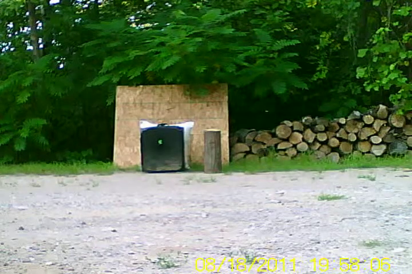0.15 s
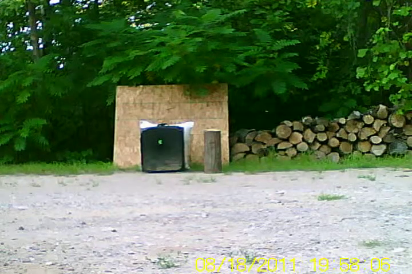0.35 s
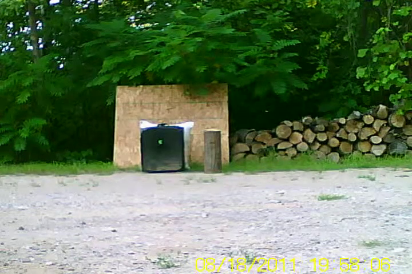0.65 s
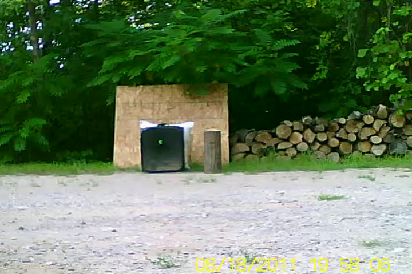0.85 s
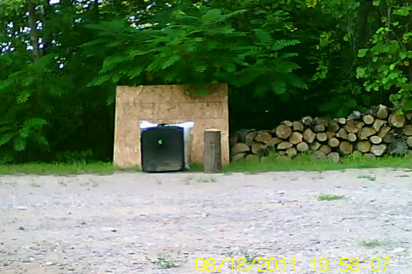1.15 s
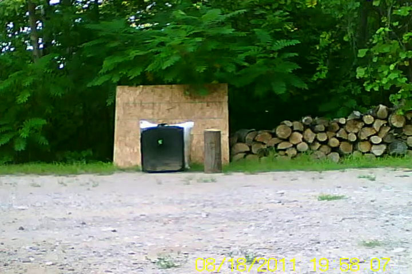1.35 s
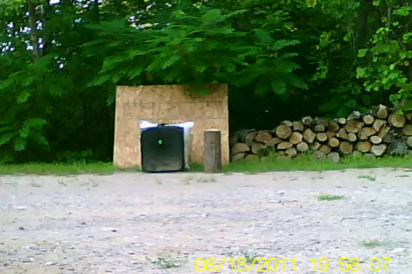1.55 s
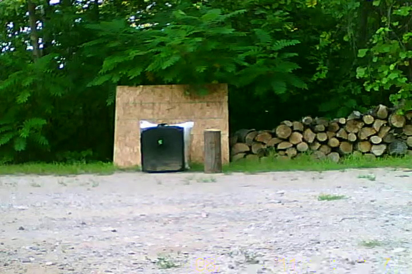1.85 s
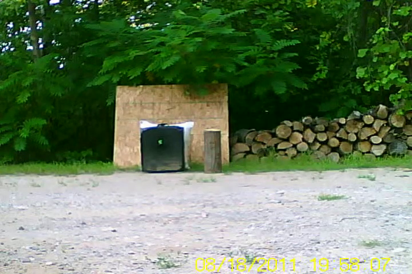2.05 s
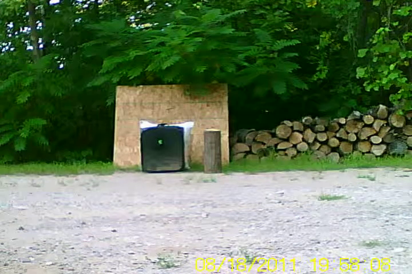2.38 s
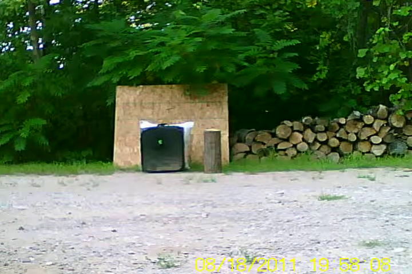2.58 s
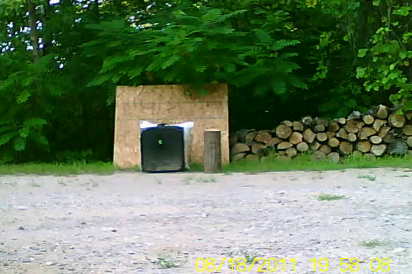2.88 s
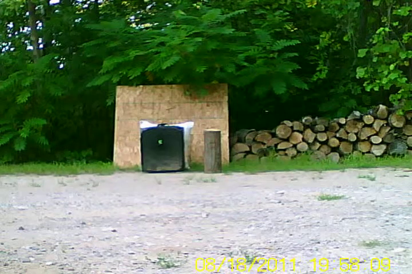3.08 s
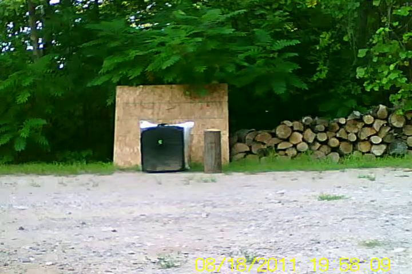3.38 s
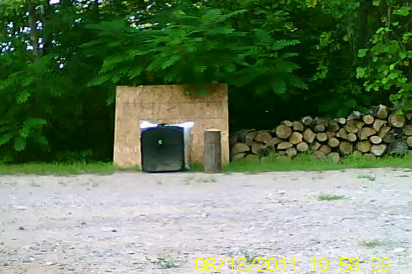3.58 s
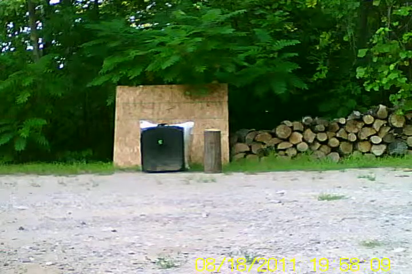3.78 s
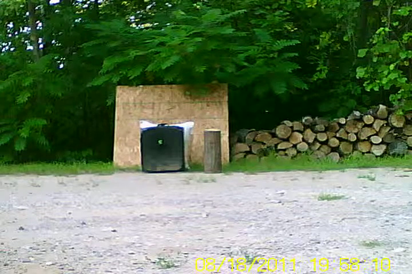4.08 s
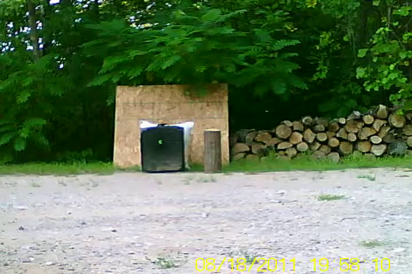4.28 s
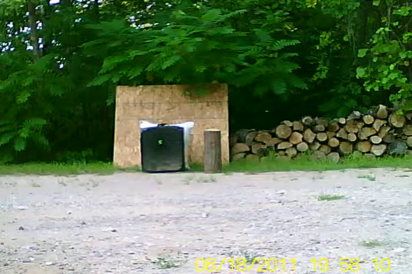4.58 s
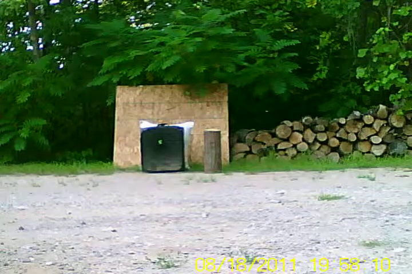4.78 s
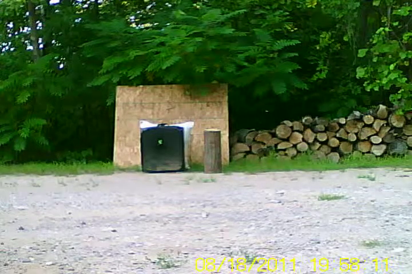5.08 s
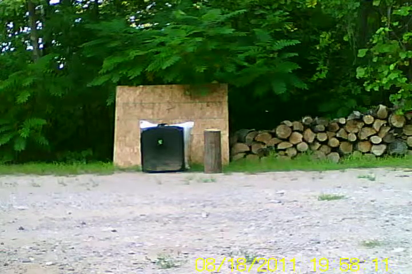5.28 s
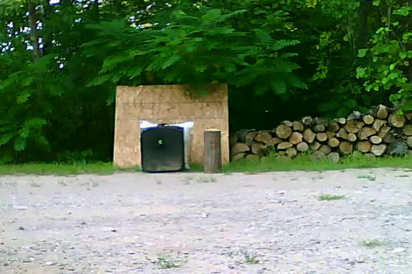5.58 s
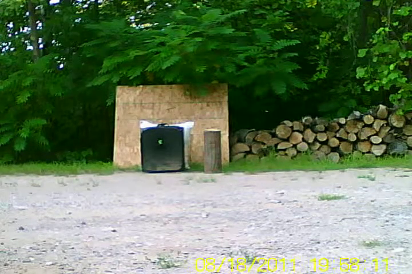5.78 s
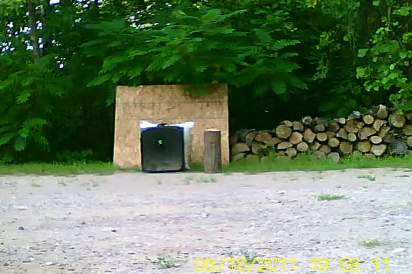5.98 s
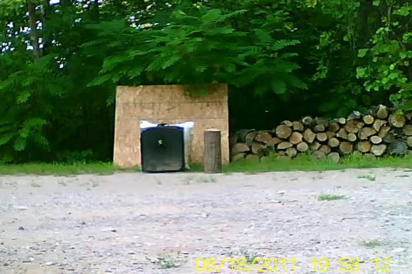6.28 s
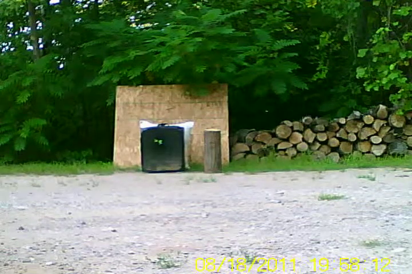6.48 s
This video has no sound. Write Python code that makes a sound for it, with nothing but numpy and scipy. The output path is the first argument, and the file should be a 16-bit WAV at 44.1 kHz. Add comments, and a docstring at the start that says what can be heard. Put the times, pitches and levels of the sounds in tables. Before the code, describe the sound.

A quiet yard edged by trees, with low air rumble and thin hiss. Two crickets chirp in short triple pulses, one close, one deeper in the leaves, with occasional soft insect rasps and a few dry ticks. Near the end a bow clicks and snaps, an arrow whistles close past the microphone, falling in pitch, and slams into a bag target with a short woody echo from the trees.

```python
"""A backyard among trees: low rumble, thin hiss and a faint hum that is gone by 1.7 s. Two crickets chirp,
one close and one deeper in the leaves, with soft insect rasps, dry ticks near 2 s and a far call near 2.8 s.
At 5.88 s a bow's release clicks and its string snaps forward; the arrow whistles by 0.55 m from the
microphone with falling pitch, then thuds into a bag target before a plywood board, and the trees answer.
Insects and arrow are shaped tones and coloured noise; blows are decaying noise and ringing tones."""
import sys
import numpy as np
from scipy import signal
from scipy.fft import rfft, irfft, next_fast_len
from scipy.io import wavfile
from scipy.ndimage import map_coordinates

SR = 44100
rng = np.random.default_rng(int(sys.argv[2]) if len(sys.argv) > 2 else 0)


def persist_wave(psi):
    """Save psi, clipped to +-1, as 16-bit WAV."""
    counts = np.round(np.clip(psi, -1, 1) * 32767).astype(np.int16)
    wavfile.write(sys.argv[1], SR, np.atleast_2d(counts).T)


N = 292824

# Every colour is a relative spectrum: its noise is brought to rms 1 before it gets a level.
# still air of the yard: pitch_hz, relative_db
YARD_AIR_COLOUR = [(15, -4), (27, -4), (60, -10), (85, -13.5), (115, -15.5), (170, -20), (260, -23),
                   (400, -27), (734, -32), (2300, -39), (3600, -41.5), (5600, -41.5), (9700, -45),
                   (11500, -50)]
# how long the trees hold each pitch: pitch_hz, t60_s
TREE_DECAY = [(100, 0.42), (500, 0.7), (1600, 0.88), (3000, 0.49), (6000, 0.4), (10000, 0.24)]
# how strongly the trees return each pitch: pitch_hz, relative_db
TREE_COLOUR = [(60, 3), (500, -14), (1000, -11.5), (1600, -5), (2400, -2.5), (3500, 0), (6000, 4.5),
               (10000, -2)]
SOUND_SPEED = 343  # m/s

# high insect rasps: start_s
RASP_TIMES = [1.167, 3.177, 5.337]
# rasp noise: pitch_hz, relative_db
RASP_COLOUR = [(3000, -29), (4500, -4), (6000, -3), (7500, -9), (10000, -21), (12000, -40)]
RASP_DB, RASP_ATTACK_S, RASP_T60_S = -54.5, 0.018, 0.61

# dry ticks: start_s, level_db
TICKS = [(1.998, -56), (2.012, -48), (2.025, -54), (2.093, -45), (2.104, -53)]
# crack of a tick: pitch_hz, relative_db
TICK_COLOUR = [(1000, -22), (2100, -7), (2650, 1), (3200, -6), (4000, -7), (10000, -25)]
TICK_CRACK_T60_S = .055
TICK_HZ, TICK_RING_DB, TICK_RING_T60_S = 2620, -4, .09  # one resonance for all; its dB is relative to the crack

# Every chirp of a cricket is built alike; the pauses between chirps differ.
# far cricket: last_stroke_s
FAR_CHIRPS = [.243, .643, 1.157, 1.758, 2.252, 2.62, 3.152, 3.6, 4.08, 4.474, 4.832, 5.285, 5.868]
FAR_DB, FAR_HZ = -53.5, 5007  # last stroke
# halo of the far cricket in the leaves: pitch_hz, relative_db
LEAF_SCATTER = [(4200, -42), (4700, -6), (5000, 0), (5200, -7), (5600, -49)]
# near cricket, strokes falling in pitch: last_stroke_s
NEAR_CHIRPS = [.383, 1.358, 2.088, 2.997, 3.573, 4.126, 4.678, 5.186]
NEAR_DB, NEAR_HZ, NEAR_GLIDE_HZ = -48.6, 4460, -170  # last stroke; glide is to either side of its middle
STROKE_S = .044  # from one wing stroke to the next
SWELL_POWER = 2.63  # a chirp starts softly and levels off towards its last stroke
STROKE_HZ_PER_DB, STROKE_SAG_HZ = 9.5, 130  # weak strokes sit lower; the pitch sags as the wing stops

# small metal click of the release: pitch_hz, relative_db
RELEASE_COLOUR = [(400, -11), (2000, -12), (3000, -8), (4400, 4), (7000, -10), (11000, -14)]
# bow contacts, from the snap of the string to the rattle of the limbs: start_s, level_db, t60_s
BOW_CONTACTS = [(5.895, -18.5, 0.028), (5.9, -24.5, 0.13), (5.918, -36.5, 0.33)]
# noise of the bow contacts: pitch_hz, relative_db
BOW_COLOUR = [(40, -5), (100, 1), (200, -2), (600, -0.5), (1000, -5), (1350, -5), (1900, -10), (2600, -5.5),
              (4200, -10), (6000, -12.5), (8000, -19), (11000, -30)]
# tones of the arrow: pitch_hz at rest, level_db at 1 m, forward_beaming_db, flex_swell (0-1)
FLETCHING = [(110, -28.5, 1, 0), (311.5, -34.5, 5, 0), (640, -35.5, 10, 0.72), (1075, -55, 14, 0.4)]
# hiss of the arrow's wake: pitch_hz, relative_db
WAKE_COLOUR = [(100, -10), (350, 2), (900, -12), (1400, -7), (1700, 0.5), (2050, 3.5), (2500, 3.5),
               (2950, -6.5), (4200, -2), (7500, -14), (11000, -22)]
# arrow pierces the cover, is stopped by the filling, shoves the bag: start_s, slap_db, slap_hz, crack_db
STRIKES = [(6.0549, -16, 623, -14.5), (6.0594, 0, 670, -21), (6.064, -14, 420, -42)]
# ringing of bag and board: pitch_hz, relative_db, t60_s
TARGET_TONES = [(181.4, -6.5, 0.09), (266, -8, 0.1), (394, -11, 0.053), (579, -5.5, 0.063),
                (777, -5, 0.073), (934, -11.5, 0.056), (1184, -6.5, 0.058), (1545, -2.5, 0.024),
                (1660, -5, 0.025), (1960, -2.5, 0.026), (2390, -8, 0.027)]
# tearing of the target's cover: pitch_hz, relative_db
CRACK_COLOUR = [(300, -5), (1700, 1.5), (2600, -6.5), (3200, -12), (4300, 1), (5600, -1), (6500, -17),
                (7700, -3), (9000, -22), (10400, -16.5), (11800, -23)]
# shudder of the bag's filling: pitch_hz, relative_db
FILLING_COLOUR = [(40, -18), (160, 6), (210, -2), (320, 0), (480, -1.5), (720, 1.5), (1300, -9.5),
                  (2500, -12.5), (3300, -24), (5500, -18.5), (11000, -42)]

TOP_HZ = 12100  # band limit at the microphone


def amp(db):
    """Decibels to gain."""
    return 10 ** (np.asarray(db) / 20)


def unit(x):
    """Scale to rms 1."""
    return x / np.sqrt(np.mean(x ** 2) + 1e-20)


def clock():
    """The time of every sample, in seconds."""
    return np.arange(N) / SR


def along(points, hz):
    """Read (Hz, value) points on a log frequency axis."""
    f, v = np.transpose(points)
    return np.interp(np.log(hz + 1), np.log(f), v)


def filtered(x, response):
    """Multiply the spectrum of x by a response of frequency."""
    m = next_fast_len(len(x) + SR // 4)
    spectrum = rfft(x, m) * response(np.fft.rfftfreq(m, 1 / SR))
    return irfft(spectrum, m)[:len(x)]


def noise(colour):
    """Noise of rms 1 with a (Hz, dB) spectrum."""
    return unit(filtered(rng.standard_normal(N), lambda hz: amp(along(colour, hz))))


def wobble(rate):
    """A smooth random curve with rate knots a second."""
    knots = rng.standard_normal(int(N * rate / SR) + 4)
    return map_coordinates(knots, [clock() * rate])


def decay(t, t60, attack):
    """Envelope of a blow at t = 0: a quick rise, then a fall of 60 dB in t60; silent before."""
    t = np.maximum(t, 0)
    return np.exp(-np.log(1000) * t / t60) * (1 - np.exp(-t / attack))


def add(track, s, sound):
    """Mix a sound into the track from time s."""
    part = track[round(s * SR):][:len(sound)]
    part += sound[:len(part)]


def outdoors(floor_db=-45.1, hum_hz=183, hum_db=-57):
    """Distant rumble and hiss, a far chorus of crickets as band noise, and a faint hum that fades early."""
    air = amp(floor_db + 0.44 * wobble(4)) * noise(YARD_AIR_COLOUR)
    chorus_colour = [(3600, -28), (4300, -5.5), (5100, -12), (5900, -47)]
    chorus = amp(-70.5 + 1.3 * wobble(9)) * noise(chorus_colour)
    fade = np.interp(clock(), [1.1, 1.7], [1, 0])
    hum = amp(hum_db) * fade * np.sin(2 * np.pi * hum_hz * clock() + .5 * wobble(4.9))
    return air + chorus + hum


def trees(x, build_s=0.034, echo_s=0.153, echo_db=3):
    """Trunk and leaf scatter builds up, a far yard edge answers; each frequency dies at its own speed."""
    hz, t, grains = signal.stft(rng.standard_normal(SR), SR, nperseg=256)
    shape = amp(along(TREE_COLOUR, hz))[:, None] * decay(t, along(TREE_DECAY, hz)[:, None], build_s)
    echo = 1 + amp(echo_db) * decay(t - echo_s, 0.12, attack=0.0022)
    tail = signal.istft(grains * shape * echo, SR, nperseg=256)[1]
    return signal.fftconvolve(x, tail / np.linalg.norm(tail))[:N]


def far_call(at_s=2.81, length_s=.1, db=-69):
    """A faint, thin call from deep in the trees: a swell of narrow noise with an unsteady level."""
    swell = np.exp(-((clock() - at_s) / length_s) ** 2)
    return amp(db + 2.3 * wobble(35.4)) * swell * noise([(2300, -25), (2780, 2), (3250, -25)])


def rasps():
    """An insect further off gives a soft high rasp of decaying noise about every two seconds."""
    envelope = sum(decay(clock() - s, RASP_T60_S, RASP_ATTACK_S) for s in RASP_TIMES)
    return amp(RASP_DB) * noise(RASP_COLOUR) * envelope


def ticks():
    """A few dry ticks in quick succession, each a short crack with a brief, unsteady ring."""
    t = clock()

    def taps(t60):
        """Envelope of all the ticks."""
        return sum(amp(db) * decay(t - s, t60, attack=.0008) for s, db in TICKS)

    crack = taps(TICK_CRACK_T60_S) * noise(TICK_COLOUR)
    tone = np.sin(2 * np.pi * TICK_HZ * t + .9 * wobble(200))
    return crack + amp(TICK_RING_DB) * taps(TICK_RING_T60_S) * tone


def cricket(chirps, count, swell_db, hz, glide_hz, width_s, rough):
    """A chirp is count wing strokes swelling by swell_db; each slides in pitch and sags as the wing stops."""
    out, t = np.zeros(N), np.arange(-SR // 25, SR // 25) / SR
    slide = glide_hz * np.tanh(t / width_s) - STROKE_SAG_HZ * np.clip(t / width_s - .5, 0, 1)
    for s in chirps:
        for k in range(count):  # counted back from the last stroke
            stroke_db = -swell_db * (k / (count - 1)) ** SWELL_POWER
            pitch = hz + STROKE_HZ_PER_DB * stroke_db + slide
            # uneven teeth on the wing jitter the phase
            teeth = rough * unit(signal.resample(rng.standard_normal(24), len(t)))
            tone = np.sin(2 * np.pi * np.cumsum(pitch) / SR + teeth)
            stroke = np.exp(-(t / width_s) ** 2) * tone
            add(out, s - k * STROKE_S + t[0], amp(stroke_db) * stroke)
    return out * (1 + 0.34 * wobble(300))


def crickets(halo_db=-10, halo_lead_s=0.038, halo_s=0.073):
    """One cricket deeper in the leaves, whose scatter fills the gaps between its strokes, and one close by."""
    far = cricket(FAR_CHIRPS, count=3, swell_db=3, hz=FAR_HZ, glide_hz=0, width_s=.012, rough=.12)
    # the halo is centred ahead of the last stroke
    blur = sum(np.exp(-((clock() - s + halo_lead_s) / halo_s) ** 2) for s in FAR_CHIRPS)
    halo = amp(halo_db) * blur * noise(LEAF_SCATTER)
    near = cricket(NEAR_CHIRPS, count=3, swell_db=9, hz=NEAR_HZ, glide_hz=NEAR_GLIDE_HZ,
                   width_s=.0105, rough=.4)
    return amp(NEAR_DB) * near + amp(FAR_DB) * (far + halo)


def release(at_s=5.8825, db=-37, t60=0.077):
    """The catch lets go of the string with a small bright click of decaying noise."""
    return amp(db) * noise(RELEASE_COLOUR) * decay(clock() - at_s, t60, attack=0.00072)


def bow(grit_db=3.4, kick_db=-21, kick_hz=105):
    """The string snaps forward: the limbs kick, and cams and arrow rest chatter as they settle."""
    shake = sum(amp(db) * decay(clock() - s, t60, attack=0.00058) for s, db, t60 in BOW_CONTACTS)
    chatter = unit(noise(BOW_COLOUR) * amp(grit_db * wobble(450)))
    t = clock() - BOW_CONTACTS[0][0]
    kick = amp(kick_db) * decay(t, 0.054, attack=0.00075) * np.sin(2 * np.pi * kick_hz * t)
    return shake * chatter - kick


def flight(launch_s=5.91, pass_s=5.975, rough=0.2, flex_hz=29, air_db=-30.0, wake_s=0.0033):
    """The vanes whistle and hiss; Doppler drops the pitch as the arrow passes the microphone."""
    speed, miss = 68, .55  # m/s; closest distance to the microphone, m
    t = clock()
    ahead = speed * (t - pass_s)  # metres beyond the microphone
    distance = np.hypot(ahead, miss)
    approach = -ahead / distance  # 1 coming straight in, -1 going away
    doppler = 1 / (1 - approach * speed / SOUND_SPEED)
    flying = np.interp(t, [launch_s, launch_s + .006], [0, 1]) * (t < STRIKES[0][0])
    flex = np.cos(2 * np.pi * flex_hz * (t - launch_s - .011))  # bending of the shaft
    whistle = np.zeros(N)
    for hz, db, forward_db, swell in FLETCHING:
        phase = 2 * np.pi * np.cumsum(hz * doppler) / SR + rough * wobble(160)
        level = amp(db + forward_db * approach) * (1 + swell * flex + rough * wobble(150))
        whistle += level * np.sin(phase)
    # the wake trails the arrow and is thrown sideways, so its hiss flares only as it goes by
    wake_distance = np.hypot(ahead - speed * wake_s, miss)
    sideways = 0.32 + 0.38 * miss / wake_distance
    wake = amp(air_db + 0.66 * wobble(300)) * sideways * noise(WAKE_COLOUR) / wake_distance
    return flying * (whistle / distance + wake)


def impact(thump_s=6.061, thump_hz=122, thump_db=3.0, thump_t60=0.042,
           ring_db=-11, shudder_db=-19.5, shudder_t60=.18):
    """Strikes dent and crack the cover, the hardest rings the target; the heavy bag thumps and shudders."""
    out, t = np.zeros(N), np.arange(SR // 2) / SR
    for s, db, hz, crack_db in STRIKES:
        cycles = hz * t
        slap = cycles * np.exp(1 - cycles ** 2 * 2) * np.sin(2 * np.pi * cycles)  # dead after about one cycle
        crack = noise(CRACK_COLOUR)[:len(t)] * decay(t, 0.017, attack=0.00075)
        add(out, s, amp(db) * slap + amp(crack_db) * crack)
    ring = sum(amp(db) * decay(t, t60, attack=0.00035) * np.sin(2 * np.pi * hz * t)
               for hz, db, t60 in TARGET_TONES)
    add(out, STRIKES[1][0], amp(ring_db) * ring)
    thump = decay(t, thump_t60, attack=0.0058) * np.sin(2 * np.pi * thump_hz * t)
    add(out, thump_s, amp(thump_db) * thump)
    shudder = noise(FILLING_COLOUR) * decay(clock() - thump_s, shudder_t60, attack=.002)
    return out + amp(shudder_db) * shudder


def scene():
    """The small creatures deeper among the trees, with more scatter, and the shot in the open yard."""
    wildlife = crickets() + rasps() + ticks() + far_call()
    shot = release() + bow() + flight() + impact()
    scatter = amp(-14.5) * trees(wildlife) + amp(-20.0) * trees(shot)
    return (outdoors() + wildlife + shot + scatter)[None]


def record(dry):
    """The microphone's chain flattens the highest peaks and rolls its treble off into a steep band limit."""
    held = dry[0] / (1 + (dry[0] / .74) ** 8) ** (1 / 8)  # no peak passes 0.74 here
    return filtered(held, lambda hz: (hz < TOP_HZ) / np.sqrt(1 + (hz / 10900) ** 40))[None]


dry = scene()
out = record(dry)
persist_wave(out)
```